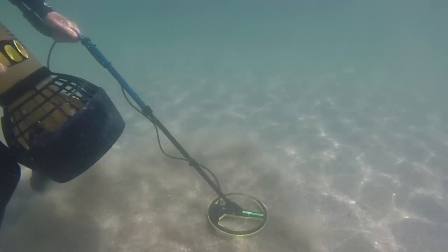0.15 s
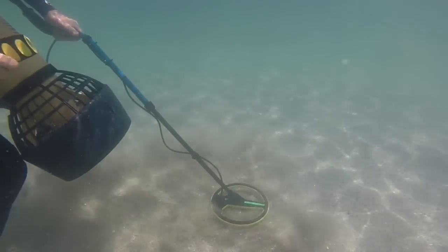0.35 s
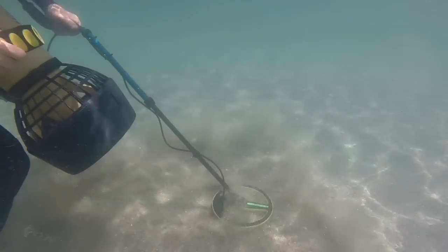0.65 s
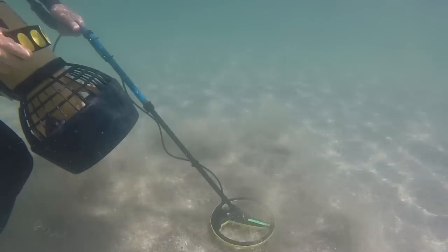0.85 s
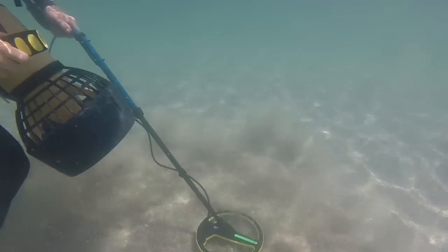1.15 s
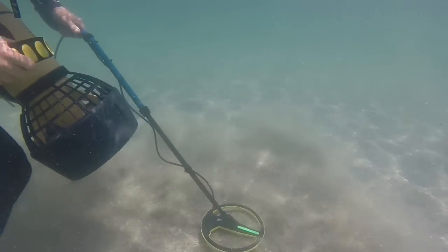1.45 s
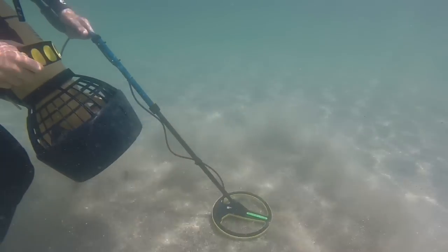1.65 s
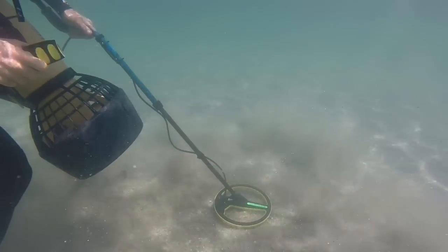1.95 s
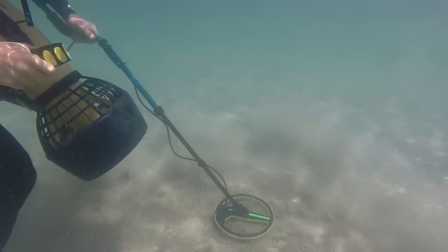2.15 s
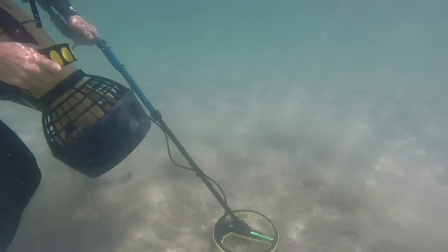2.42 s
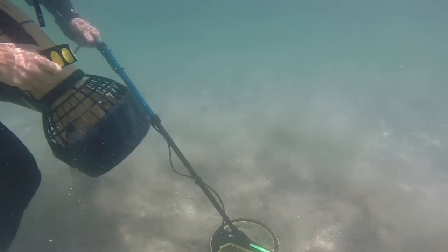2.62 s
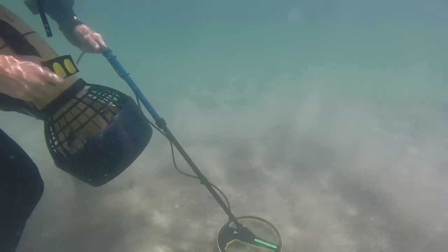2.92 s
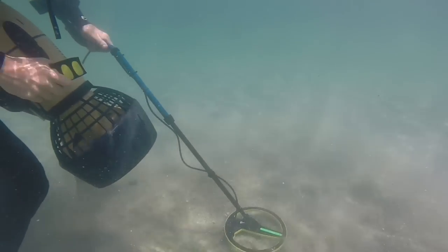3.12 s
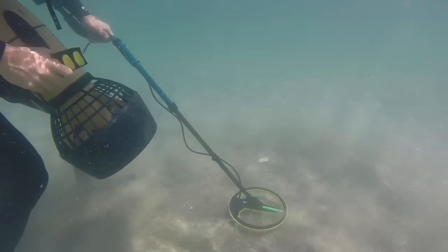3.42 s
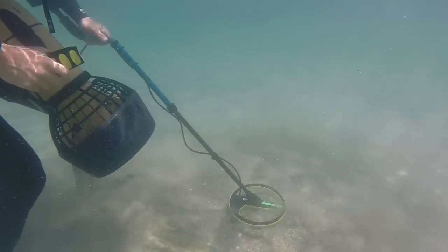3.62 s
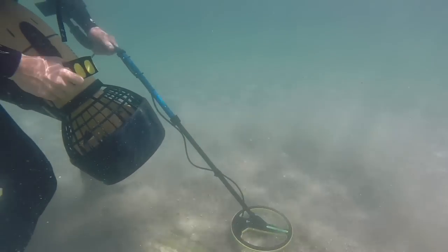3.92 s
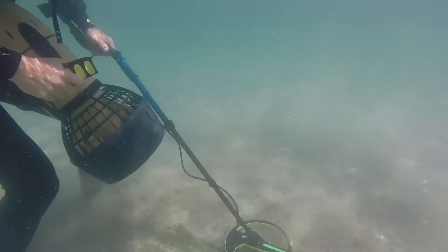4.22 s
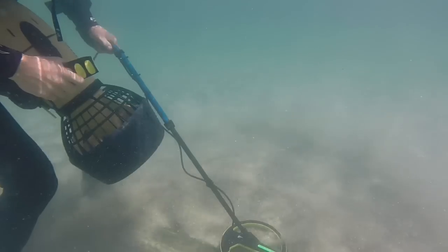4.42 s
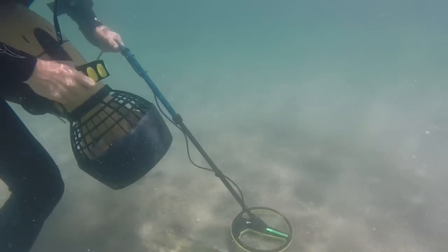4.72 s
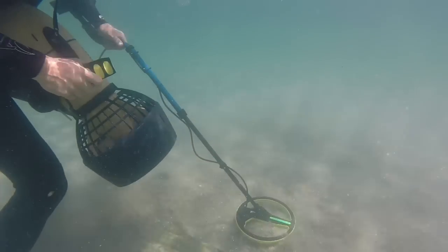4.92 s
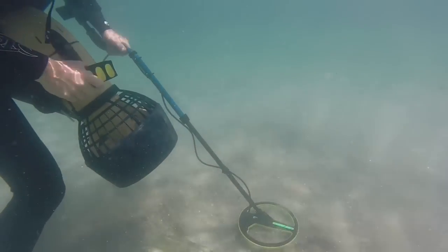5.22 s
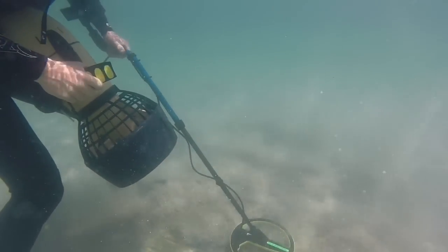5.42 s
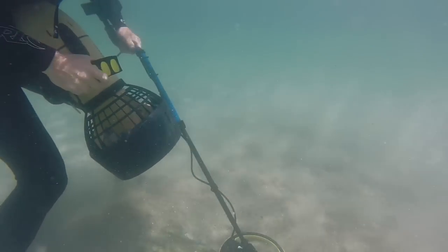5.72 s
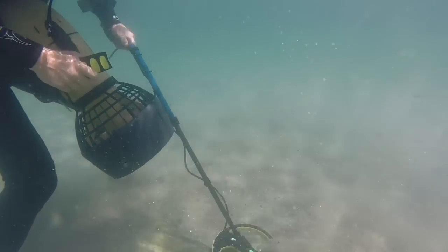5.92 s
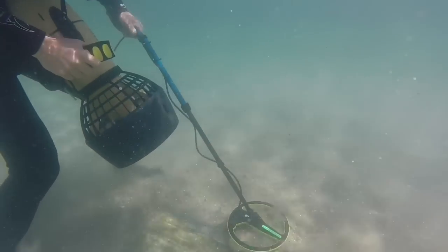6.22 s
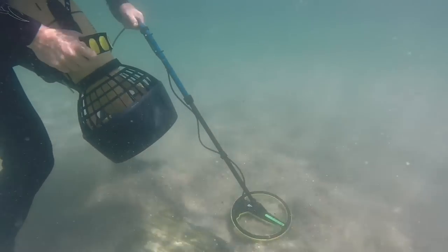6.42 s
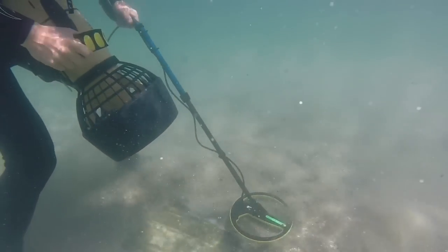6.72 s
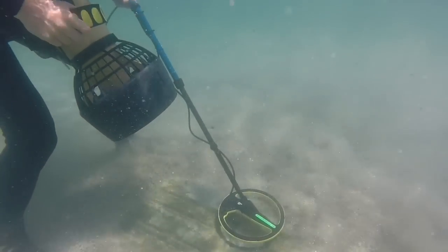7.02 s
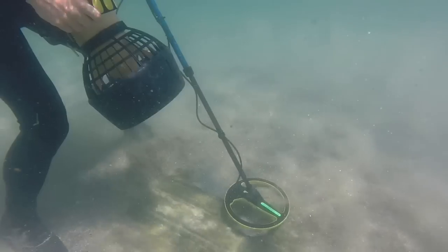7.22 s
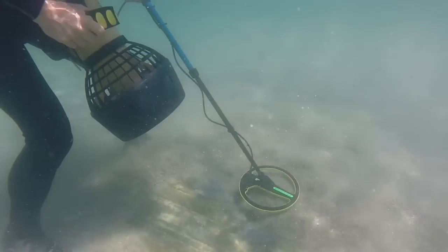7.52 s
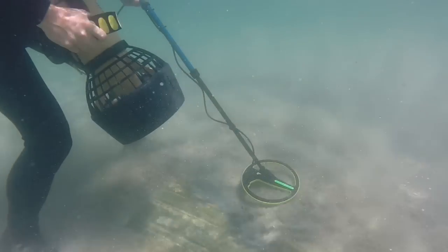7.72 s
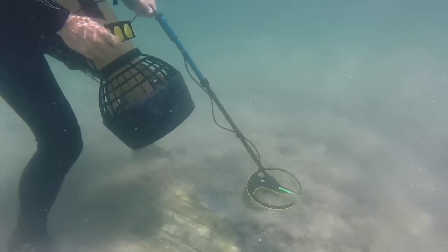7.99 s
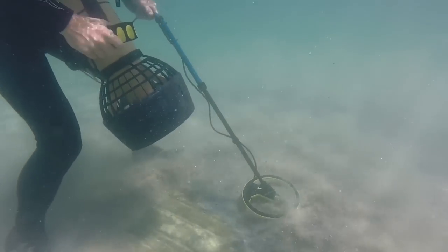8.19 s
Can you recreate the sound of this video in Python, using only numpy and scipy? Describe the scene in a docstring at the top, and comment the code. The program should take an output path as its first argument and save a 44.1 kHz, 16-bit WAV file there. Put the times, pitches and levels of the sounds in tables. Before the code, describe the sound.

An electric underwater scooter runs close to the microphone, giving a steady mid-pitched whine over a rough, grinding gear growl. A light scraping pulses quickly with each propeller turn, and fine sand ticks faintly against the camera housing. From about three seconds in, occasional gusts of propeller wash add a low rumble and a few dull thumps. The motor grows slightly brighter near the end.

```python
"""A steady whine over a rough growl: an electric underwater scooter runs close to a camera housing.
Its motor and gears give tones locked to the shaft speed, while impacts of the gear teeth excite the
resonances of hull and housing. The shaft seal scrapes over the same rough spots on every turn.
Behind these, the propeller wash throws ticking sand off the seabed and now and then buffets the housing."""
import sys
import numpy as np
from scipy import signal
from scipy.fft import rfft, irfft, next_fast_len
from scipy.io import wavfile

SR = 44100
rng = np.random.default_rng(int(sys.argv[2]) if len(sys.argv) > 2 else 0)


def wav_record(signal):
    """Record a signal, one row per channel, as 16-bit PCM in the file named by sys.argv[1]."""
    frames = np.transpose(np.atleast_2d(signal))
    bounded = np.clip(frames, -1, 1)
    # unit amplitude maps onto the largest positive 16-bit level
    quanta = np.round(bounded * 32767).astype(np.int16)
    wavfile.write(sys.argv[1], SR, quanta)


N = 368235
TIME = np.arange(N) / SR
FFT_SIZE = next_fast_len(N + 8192)
FREQ = np.arange(FFT_SIZE // 2 + 1) * SR / FFT_SIZE

# Directivity of the hull. Each row: band centre in Hz, gain in dB when it faces the housing squarely.
HULL_DIRECTIVITY = [(220, 0), (700, 1.1), (1250, 1.8), (1800, 0), (2450, -2.5), (3000, 2), (4700, -2.5),
                    (5600, 0), (6200, 4), (7300, 5.5), (8300, 3.5), (9600, -3.5), (11000, -0.5),
                    (14600, 1.6)]
# Gusts of propeller wash. Each row: start in seconds, peak level in dB, rise time in seconds.
WASH_GUSTS = [(3.18, -47, 0.18), (4.95, -46.5, 0.4), (6.25, -43, .3), (7.12, -42, 0.068), (7.7, -47, .05)]
# Strong eddies striking the housing. Each row: start in seconds, envelope peak in dB, pitch in Hz.
EDDY_THUMPS = [(3.29, -31, 130), (3.345, -34, 105), (6.705, -28.5, 48), (7.149, -28.5, 61.9),
               (7.241, -27, 57.9)]
# Ticks of three sizes of sand grain. Each row: centre in Hz, width in Hz, spectral density in dB.
GRAIN_RESONANCES = [(8500, 1800, -101), (11200, 2000, -104), (13800, 1800, -115)]
# Rough spots under the shaft seal.
# Each row: place in turns, spread in turns, centre in Hz, width in Hz, relative level in dB.
SEAL_SPOTS = [(.03, 0.046, 11400, 2000, -94), (0.23, 0.075, 3270, 260, -70.5), (0.28, 0.08, 5850, 340, -81),
              (0.31, .06, 9900, 600, -97), (0.34, 0.054, 8180, 1470, -87), (.54, 0.066, 8980, 700, -90),
              (.57, .08, 13300, 1300, -111), (0.74, .05, 10900, 700, -94.5), (0.73, 0.074, 5060, 380, -80),
              (0.745, 0.098, 4006, 520, -72.5)]
# Resonances of hull and housing. Each row: centre in Hz, width in Hz, relative level in dB.
BODY_MODES = [(130.2, 56.6, -63.5), (243, 98, -72.5), (321, 120, -71.5), (462, 68, -74.5),
              (594.5, 114, -64), (672, 48, -62), (785.5, 204, -57.5), (952, 141, -57.5), (1017, 31, -61.5),
              (1187, 62, -75.5), (1418, 146, -63.5), (1684, 133, -58.5), (1823, 213, -57.5),
              (1995, 177, -62), (2312, 225, -69), (2640, 460, -72), (3370, 1020, -73), (4054, 780, -76.5),
              (4730, 350, -83), (5340, 240, -84.5), (5890, 430, -87), (6130, 370, -81.5), (6920, 600, -86),
              (7660, 840, -89.5), (8780, 1380, -89), (10150, 400, -96), (11100, 1440, -95.5),
              (12991, 920, -102.6), (14800, 900, -106.4)]
# Tones of motor and gears. Each row: frequency in Hz at cruising speed, relative level in dB.
DRIVE_TONES = [(110.4, -55.5), (123.8, -58), (151.5, -51.5), (255.7, -64.5), (313.6, -62.5), (333.8, -69.5),
               (391.6, -61.5), (524.9, -65), (668.9, -58), (682.3, -50), (690.2, -49), (757.7, -38.5),
               (908.6, -47.5), (946.1, -52.5), (967.6, -47.5), (974.3, -44.5), (1336.4, -53.5),
               (1444.1, -52.5), (1575.8, -46.5), (1678.2, -49), (1726.7, -47), (1838.2, -45.5)]
# Rough upper whine of the gear teeth. Each row: centre in Hz, width in Hz, relative level in dB.
WHINE_BANDS = [(2360, 40, -71), (3035, 26, -67.5), (3149, 36, -65), (4603, 24, -74.5), (4722, 60, -79),
               (6185, 50, -77), (7770, 60, -88)]

CRUISE_HZ, WANDER_HZ = 131.3, 0.12  # motor turns a second, and their rms deviation
GEAR_RATIO = CRUISE_HZ / 7.1  # the propeller turns 7.1 times a second


def undb(db):
    """Amplitude grows tenfold for every 20 dB."""
    return 10 ** (np.asarray(db) / 20)


def unit(x):
    """Normalisation to an rms of 1."""
    return x / np.sqrt(np.mean(x ** 2))


def wander(rate_hz):
    """Random fluctuation of rms 1: linear interpolation between levels drawn at the given rate."""
    levels = rng.standard_normal(int(N / SR * rate_hz) + 3)
    return unit(np.interp(TIME * rate_hz + rng.random(), np.arange(len(levels)), levels))


def resonances(modes):
    """Resonance peaks add in power; the gain gives unit white noise the listed spectral density."""
    power = sum((undb(db) / (1 + (2 * (FREQ - hz) / width) ** 2)) ** 2 for hz, width, db in modes)
    return np.sqrt(SR / 2 * power)


def power_below(hz, order=8):
    """Power response of a maximally flat low-pass filter."""
    return 1 / (1 + (FREQ / hz) ** (2 * order))


def ring(x, gain):
    """Causality: a minimum-phase filter of this gain rings only after each impact."""
    cepstrum = irfft(np.log(gain + 1e-6), FFT_SIZE)
    cepstrum[1:FFT_SIZE // 2] *= 2
    cepstrum[FFT_SIZE // 2 + 1:] = 0
    return irfft(rfft(x, FFT_SIZE) * np.exp(rfft(cepstrum)), FFT_SIZE)[:N]


def impacts(per_s, spread_db):
    """Shot noise of rms 1: independent impulses of uneven strength."""
    strength = undb(spread_db * np.minimum(rng.exponential(size=N), 5))
    lands = rng.random(N) < per_s / SR
    return unit(lands * strength * rng.choice([-1, 1], N))


def surge(start_s, rise_s):
    """A critically damped pulse swells to 1 in the rise time and decays more slowly."""
    age = np.maximum(TIME - start_s, 0) / rise_s
    return age * np.exp(1 - age)


def passing(turns, place, spread):
    """Rotation makes contact periodic: a bell-shaped pulse peaks as the shaft passes this place."""
    away = (turns - place + 0.5) % 1 - 0.5
    return np.exp(-0.5 * (away / spread) ** 2)


def motion(nearest_s=1.25, drift_period_s=6.0, swing_s=6.36, swing_scale_s=0.65):
    """Level follows distance as the scooter drifts; the diver swings it once to face the housing (1)."""
    near_db = -0.2 + 0.52 * np.cos(2 * np.pi * (TIME - nearest_s) / drift_period_s)
    swung = (1 + np.tanh((TIME - swing_s) / swing_scale_s)) / 2
    facing = -0.4 + 1.4 * swung
    return near_db, facing


def water_path(x, facing):
    """Directivity beams some bands and shades others; churning water makes each flicker, the treble most."""
    centres, gains_db = np.transpose(HULL_DIRECTIVITY)
    spectrum, out = rfft(x, FFT_SIZE), 0
    for hz, db, weights in zip(centres, gains_db, np.eye(len(centres))):
        band = irfft(spectrum * np.interp(FREQ, centres, weights), FFT_SIZE)[:N]
        flicker_db = 0.75 * min(hz / 3500, 1) * wander(45)
        out = out + band * undb(db * facing + flicker_db)
    return out


def wash(facing):
    """Turbulent pressure buffets the housing in gusts; the strongest eddies land as brief, dull thumps."""
    rumble_band = power_below(40, order=2) * (1 - power_below(7.9, order=2))
    eddies = unit(ring(rng.standard_normal(N), np.sqrt(rumble_band)))
    steady_power = undb(-56 + 5.5 * facing) ** 2
    gust_power = sum((undb(db) * surge(start, rise)) ** 2 for start, db, rise in WASH_GUSTS)
    thumps = sum(undb(db) * surge(start, rise_s=0.0048) * np.sin(2 * np.pi * hz * (TIME - start))
                 for start, db, hz in EDDY_THUMPS)
    return eddies * np.sqrt(steady_power + gust_power) + thumps


def sand():
    """Impact excitation: grains tick on the housing, each size at its own pitch."""
    return sum(ring(impacts(per_s=110, spread_db=6.5), resonances([grain])) for grain in GRAIN_RESONANCES)


def shaft_seal(propeller_turns):
    """Friction is a dense train of tiny impacts: each rough spot scrapes once a turn with varying force."""
    out = 0
    for place, spread, hz, width, db in SEAL_SPOTS:
        force = passing(propeller_turns, place, spread) * undb(2.0 + 1.3 * wander(11))
        grit = impacts(per_s=7000, spread_db=2.0) * force
        out = out + ring(grit, resonances([(hz, width, db)]))
    return out


def load_db(turns, heavy_at, once_db, twice_db):
    """Cyclic loading modulates the level once and twice a turn, heaviest at one place."""
    angle = 2 * np.pi * (turns - heavy_at)
    return once_db * np.cos(angle) + twice_db * np.cos(2 * angle)


def chatter(motor_turns, worn_share, per_s, spread_db, throb):
    """Tooth impacts are amplitude-modulated by the motor turn; worn teeth repeat every propeller turn."""
    turn_samples = int(SR * GEAR_RATIO / CRUISE_HZ)
    place = (motor_turns / GEAR_RATIO % 1 * turn_samples).astype(int)
    worn = unit(impacts(per_s, spread_db)[place])
    teeth = np.sqrt(worn_share) * worn + np.sqrt(1 - worn_share) * impacts(per_s, spread_db)
    return unit(teeth * (1 + throb * np.cos(2 * np.pi * motor_turns)))


def gearbox(motor_turns, near_db):
    """Forced vibration: chatter drives hull and housing in three bands that follow the propeller load."""
    turns = motor_turns / GEAR_RATIO
    growl_db = load_db(turns, heavy_at=0.083, once_db=0.77, twice_db=0.12) + near_db
    rasp_db = load_db(turns, heavy_at=0.21, once_db=1.18, twice_db=0.1) + 0.36
    hiss_db = load_db(turns, heavy_at=0.15, once_db=0.4, twice_db=0.04) - 0.7
    # The upper two bands dip where the teeth run slack.
    rasp_db -= 5.2 * passing(turns, place=0.31, spread=0.062)
    hiss_db -= 2.7 * passing(turns, place=0.92, spread=0.062)
    growl = chatter(motor_turns, worn_share=0.39, per_s=3500, spread_db=1.2, throb=0.08)
    growl *= undb(growl_db)
    rasp = chatter(motor_turns, worn_share=0.24, per_s=6000, spread_db=2.0, throb=0.12)
    rasp *= undb(rasp_db + 0.25 * wander(70))
    hiss = chatter(motor_turns, worn_share=0.12, per_s=6000, spread_db=3.5, throb=0.06)
    hiss *= undb(hiss_db + 0.24 * wander(80))
    body = resonances(BODY_MODES)
    below_rasp, below_hiss = power_below(2350), power_below(5550)
    return (ring(growl, body * np.sqrt(below_rasp))
            + ring(rasp, body * np.sqrt((1 - below_rasp) * below_hiss))
            + ring(hiss, body * np.sqrt(1 - below_hiss)))


def whine(motor_turns, near_db):
    """Periodic forces give tones locked to the motor, fluttering in level and phase, under narrow noise."""
    motor_clock = motor_turns / CRUISE_HZ
    tones = 0
    for hz, db in DRIVE_TONES:
        amplitude = np.sqrt(2) * undb(db + near_db + 1.37 * wander(16))
        phase = 2 * np.pi * (hz * motor_clock + rng.random()) + 0.22 * wander(16)
        tones = tones + amplitude * np.sin(phase)
    upper_whine = ring(rng.standard_normal(N), resonances(WHINE_BANDS)) * undb(1.8 * wander(40))
    return (tones + upper_whine) * undb(-0.5)


def scene():
    """Superposition: gears, whine and seal share one motor and cross the water to join sand and wash."""
    motor_turns = np.cumsum(CRUISE_HZ + WANDER_HZ * wander(2.5)) / SR
    near_db, facing = motion()
    scooter = gearbox(motor_turns, near_db) + whine(motor_turns, near_db)
    scooter += shaft_seal(motor_turns / GEAR_RATIO)
    return (water_path(scooter, facing) + sand() + wash(facing))[None]


def record(dry):
    """Band limiting: the camera's steep low-pass removes the treble above 15250 Hz."""
    return signal.sosfilt(signal.ellip(10, 0.2, 80, 15250, fs=SR, output="sos"), dry)


dry = scene()
out = record(dry)
wav_record(out)
```